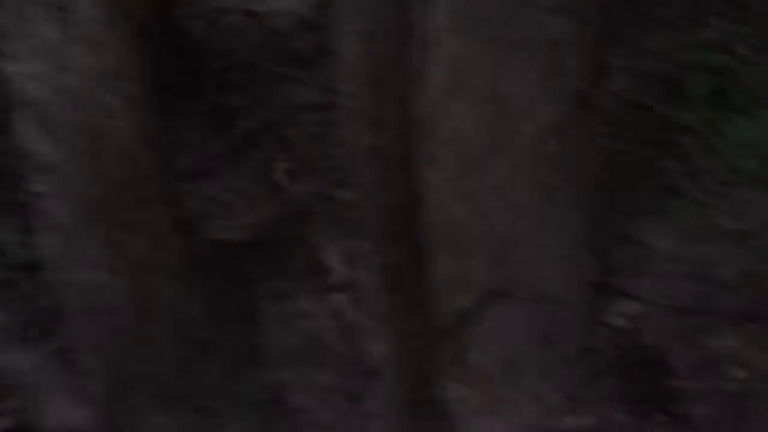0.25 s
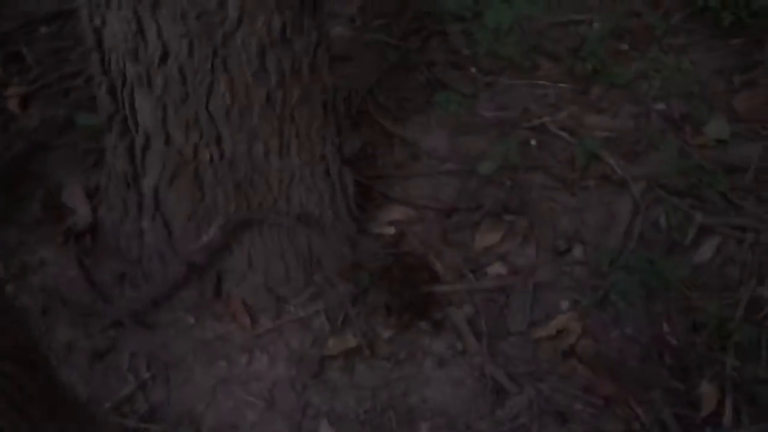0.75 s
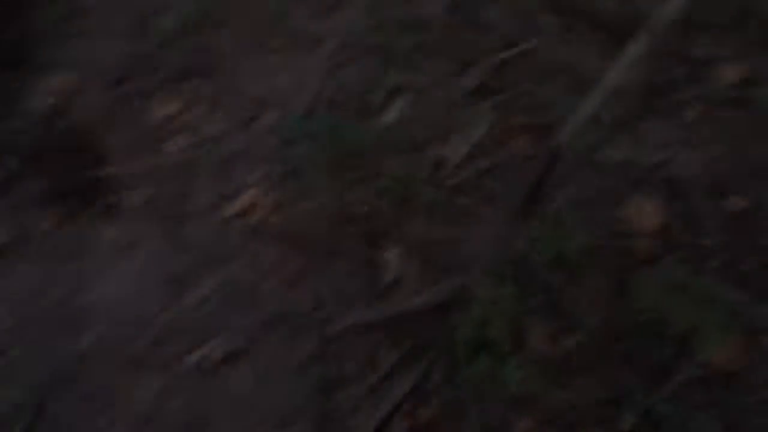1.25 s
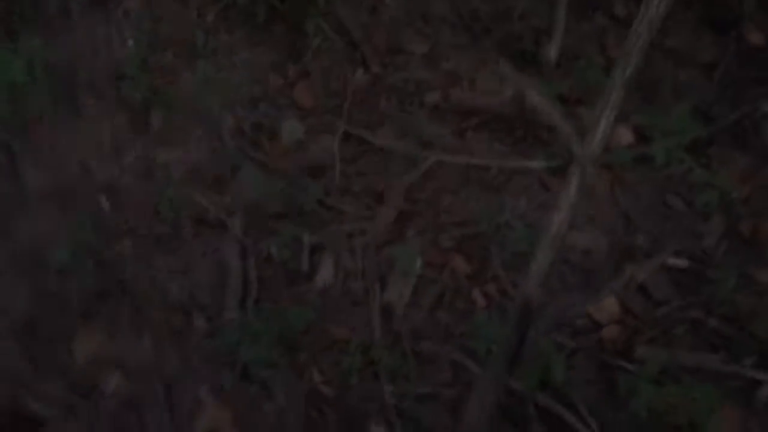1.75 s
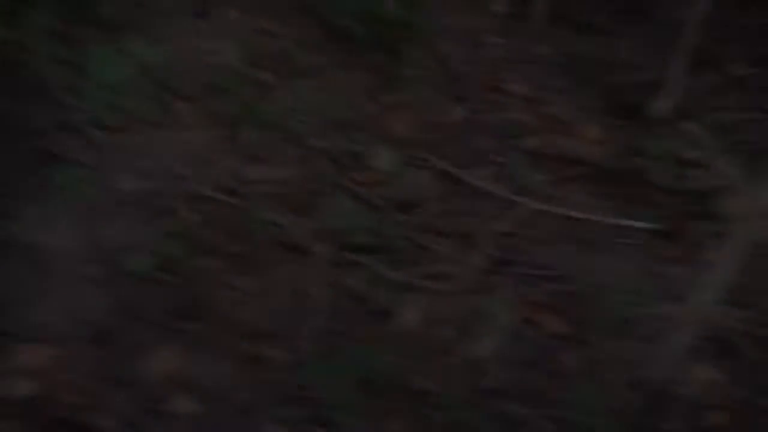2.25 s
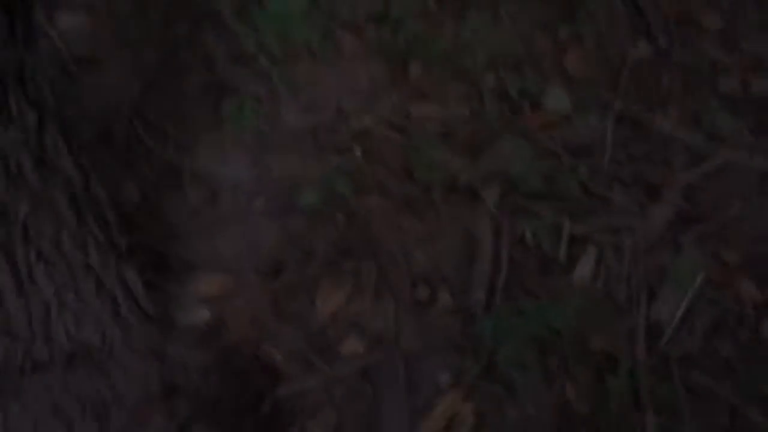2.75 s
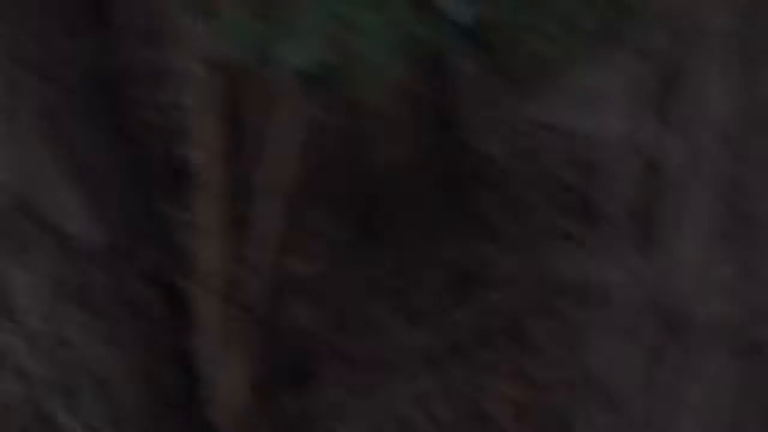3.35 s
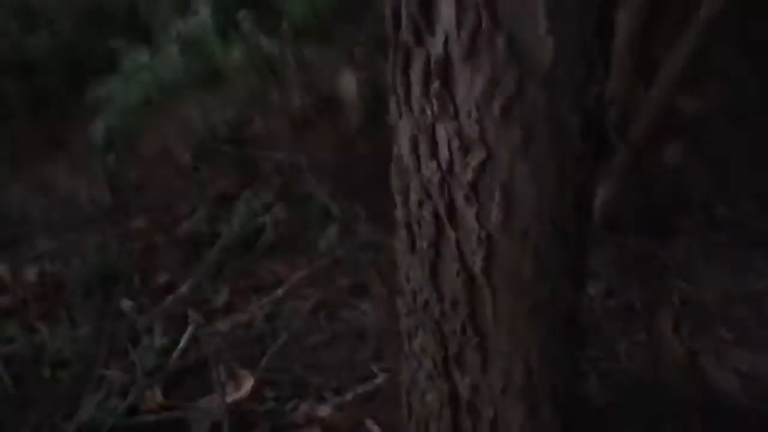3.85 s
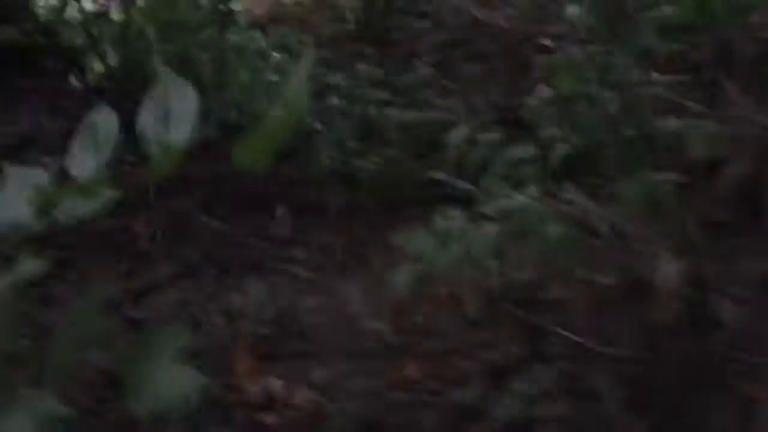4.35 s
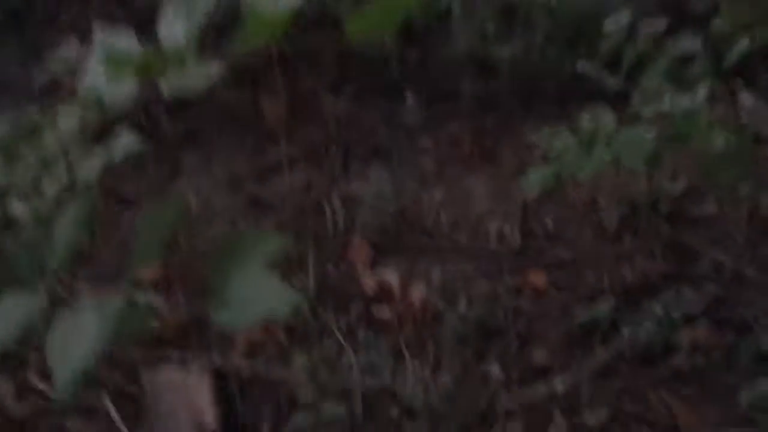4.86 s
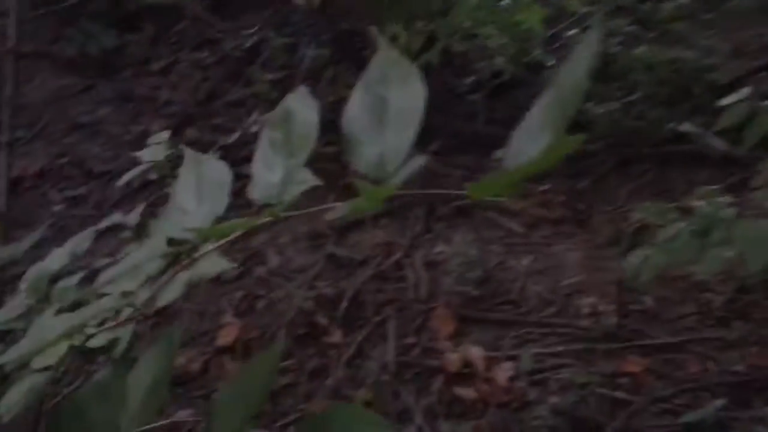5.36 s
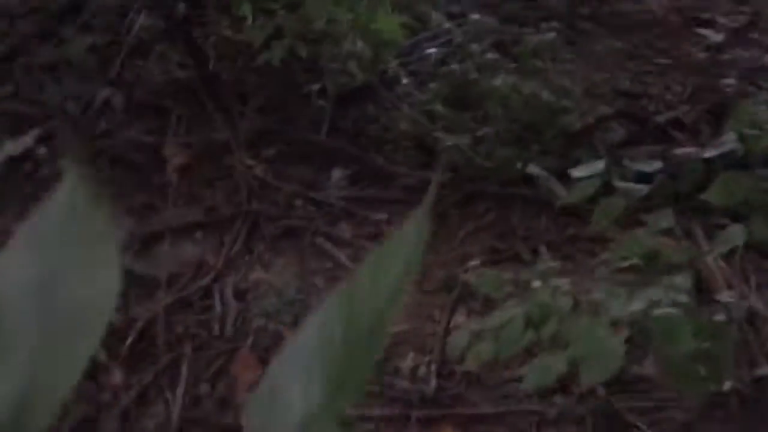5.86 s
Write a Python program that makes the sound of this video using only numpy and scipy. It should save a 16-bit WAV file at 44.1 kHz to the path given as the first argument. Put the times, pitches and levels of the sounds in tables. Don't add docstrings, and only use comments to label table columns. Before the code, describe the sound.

Slow footsteps crush dry leaves and snap brittle twigs on a woodland floor, over faint wind rumble, quiet hiss and distant insects.

```python
import sys
import numpy as np
from scipy import signal
from scipy.fft import rfft, irfft
from scipy.io import wavfile
from scipy.ndimage import uniform_filter1d

SR = 44100
rng = np.random.default_rng(int(sys.argv[2]) if len(sys.argv) > 2 else 0)


def rack_gain(trim_db):
    fader = np.asarray(trim_db, float)
    return 10 ** (fader / 20)


def output_pcm(signal):
    pcm = np.clip(np.atleast_2d(signal).T, -1, 1) * 32767
    wavfile.write(sys.argv[1], SR, np.round(pcm).astype(np.int16))


N = 269010

# frequency in Hz, density in dB per Hz.
AIR_COLOUR = [(88, -45.5), (150, 3), (230, -2), (340, -9), (545, -14), (1550, -14), (1890, -22),
              (2340, -18.5), (4800, -33), (6070, -36), (7660, -62), (10800, -28), (14600, -11),
              (15600, -6.5), (16500, -14)]
# pitch in Hz, width in Hz, level in dB.
INSECTS = [(6124, 290, -72.5), (5400, 500, -75.5), (4560, 140, -84.5), (2350, 370, -78.5)]
# frequency in Hz, width in Hz, level in dB.
HUMS = [(52.8, 11.6, -1.5), (71.4, 13.7, -5.5), (108, 21.6, 7), (135, 80, -8.5), (208, 42, -6)]
# time in seconds, rumble level in dB.
GUSTS = [(0.0, -49), (1.2, -53), (1.53, -47), (2.02, -54), (2.65, -50), (2.94, -50), (3.19, -56),
         (3.7, -53.5), (3.79, -54), (3.86, -54), (4.02, -48), (4.72, -51), (4.82, -47), (5.3, -60),
         (5.54, -59), (5.84, -54.5), (6.1, -46.5)]

# time in seconds, crush level in dB.
CRUSH = [(0.0, -66), (0.42, -70.5), (0.58, -59.5), (1.05, -65.5), (1.6, -55), (1.92, -62.5), (2.33, -58),
         (2.7, -67), (2.95, -63), (3.52, -55.5), (3.75, -61), (3.92, -58), (4.06, -66), (4.35, -57),
         (4.89, -64), (5.13, -61), (5.33, -56.5), (5.6, -60), (5.81, -57.5), (6.1, -60.5)]
# middle in seconds, half length in seconds, crush level in dB,
# large leaves in dB relative to the small ones.
LEAF_ROLLS = [(0.525, 0.045, -43, -8.5), (1.024, 0.058, -58, 2.5), (1.311, 0.037, -47.5, -12),
              (1.379, 0.033, -53, -13), (1.42, 0.024, -60, -5), (1.634, 0.04, -39, -8.5),
              (1.708, 0.045, -53, -9), (2.285, 0.047, -55.5, -3), (2.406, 0.024, -45.5, -5.5),
              (2.575, 0.018, -68.5, 11.5), (2.646, 0.037, -64, 5.5), (3.172, 0.016, -42, -15.5),
              (3.229, 0.037, -45, -7.5), (3.297, 0.048, -55, -9), (4.58, 0.044, -49, -5.5),
              (4.67, 0.069, -62.5, -3.5), (4.822, 0.047, -51, -23), (5.327, 0.015, -50.5, -5),
              (5.42, 0.04, -42, -8.5), (2.957, 0.026, -55, -5.5), (4.166, .012, -44.5, -9),
              (5.366, 0.011, -42, -5), (5.242, 0.041, -58.5, 3)]
LEAF_HZ = (1300, 1900, 2800, 4100, 5500, 6500, 8800, 12500, 14500)
# frequency in Hz, gain in dB.
CRISP = [(1800, -21.5), (3200, -14), (4600, -7.5), (6400, -3), (8300, -5.5), (9500, -3), (11500, -2.5),
         (14000, -37)]
DULL = [(350, -16), (650, -7), (1000, -3.5), (2200, -1.5), (3300, -2.5), (4300, -4), (6500, -17.5)]
FINE = [(7500, -39), (9500, -0.5), (11500, 4.5), (13000, 3.5), (15300, 5.5), (16000, 7), (16800, -41)]

# start in seconds, peak
# in dB, dull part in dB relative to the peak.
TICKS = [(0.0785, -44, -10), (0.3564, -39.5, -12), (0.397, -37, -13), (0.444, -40, -4), (0.606, -35.5, -11),
         (0.7136, -44, -6), (0.8654, -38, -13), (0.9444, -36.5, -13.5), (0.9933, -36, -16),
         (1.084, -39, -27), (1.1046, -39, -13), (1.5212, -39, -24), (1.5755, -36, -16), (1.9524, -50, -16),
         (2.0796, -52, -10), (2.141, -41, -27), (2.86, -42, -15), (3.1352, -35.5, -8.5), (3.217, -41, -24),
         (3.274, -34, -23), (3.4168, -45, -5), (3.752, -47, -3), (3.8016, -40, -32), (4.2762, -34, -12),
         (4.449, -39, -22), (4.635, -36, -19), (4.677, -37, -13), (4.792, -49, -21), (5.3105, -38, -18),
         (6.066, -44, -16),
         (0.506, -33, -15), (0.529, -32, -15), (0.698, -40, -12), (1.0485, -42, -15), (1.1403, -44, -15),
          (1.612, -31, -17), (1.632, -30, -15), (1.667, -34, -15), (1.851, -42, -25), (2.26, -43, -15),
          (2.287, -44, -15), (2.381, -39, -13), (2.7935, -52, -14), (3.246, -37, -13), (3.358, -36, -17),
          (3.5229, -35, -18), (4.1056, -48, -20), (4.139, -37.5, -18), (4.543, -40, -14), (4.605, -42, -15),
          (4.7187, -41, -15), (4.9596, -53, -15), (5.3223, -37, -15), (5.5837, -49, -15), (5.733, -40, -4),
          (6.0057, -45, -15)]
# start in seconds, peak in dB, dull and fine parts in dB relative to the peak.
STALKS = [(0.4987, -37, -3, -18), (0.5134, -33, -25, -15), (0.5433, -21, -32, -18), (0.7392, -36, -18, -9),
          (0.7539, -27.5, -16, -12), (0.7713, -26.5, -17, -11), (0.844, -35.5, -30, 0.5),
          (1.217, -35.5, -11, -20), (1.2397, -35, -23, -6), (1.3302, -25, -14, -8), (1.4152, -32, -15, -10),
          (1.555, -34, -17, -9), (2.1648, -30.5, -16, -9), (2.3123, -33, -25, -9), (2.396, -40, -19, -12),
          (2.46, -32, -18, -14), (2.8911, -32, -11.5, -12), (3.1574, -40, -10, -14), (3.163, -35, -13, -16),
          (3.3057, -28, -19, -10), (3.6684, -28, -37, -11), (4.3214, -34.5, -7.5, -12),
          (4.342, -35.5, -21, -6), (4.495, -37, -10.5, -2.5), (4.8167, -30.5, -30, -9),
          (5.1165, -30, -38, -14), (5.47, -34, -20, -7), (5.6277, -33, -17, -13), (5.834, -31, -11, -16),
          (1.396, -32, -20, -10)]
# start in seconds, peak in dB, dull and fine parts in dB relative
SNAPS = [(0.6406, -29, -11, -10), (0.683, -22, -28, -10), (0.8218, -22, -38, -9.5), (1.174, -25, -13, 0),
         (1.291, -18.5, -21, -8), (1.3565, -14.5, -12, -18), (1.3845, -24.5, -25, -2.5),
         (1.4495, -27.5, -10, -10), (1.6566, -20, -17, -18), (2.9764, -15.5, -32, -12),
         (3.044, -30, -21, -2), (3.3324, -11, -12.5, -3), (3.3722, -21.5, -16.5, -14),
         (3.4028, -27.5, -27, -8), (3.6137, 4.5, -24.5, -15), (3.6484, -19, -13, -12),
         (4.1678, -15, -12, -3), (4.5695, -23, -37, -15), (5.215, -18, -22, -5.5), (5.358, -33, -16.5, -6),
         (5.3729, -10, -30, -2), (5.4849, -15, -47, -17), (5.6704, -2.5, -28, -11.5),
         (5.689, -23.5, -15, -10), (5.7618, -22, -26, -5), (5.8, -18, -15.5, -3.5),
         (5.869, -14, -16.5, -4.5), (5.9148, -18, -15, -9.5)]
# start in seconds, peak in dB,
# dull and fine parts in dB relative to the peak.
LAST_FIBRES = [(1.277, -30, -15, -4), (1.3036, -21, -31, -10), (1.378, -30, -23, -1),
               (3.3286, -25, -25, -14), (3.3343, -18, -15, -11), (3.6155, -7.5, -14, -12),
               (5.3775, -11.5, -32, -7), (5.4795, -24, -22, -11), (1.288, -29, -25, -6),
               (1.3185, -29, -22, -12), (1.434, -40, -4, -14)]
# start in seconds, peak in dB, pitch in Hz.
SPLINTERS = [(0.5235, -32, 6050), (0.5425, -37, 6430), (1.1745, -34, 2220), (1.292, -32, 6360),
             (1.305, -28, 5500), (1.3567, -28.5, 2500), (1.3581, -27, 1310), (1.62, -36, 2800),
             (1.64, -42, 4600), (3.166, -34, 3580), (3.333, -20, 3570), (3.374, -31, 2330),
             (3.3733, -33, 3620), (3.6145, -18, 1560), (3.615, -17, 2200), (3.648, -35, 2500),
             (4.168, -28, 5900), (4.168, -30, 3900), (4.321, -40.5, 2900), (4.348, -42, 1600),
             (4.342, -44, 2520), (4.54, -46, 2600), (4.6, -42, 2600), (5.2158, -23.5, 5180),
             (5.215, -33, 1350), (5.379, -24, 6320), (5.4848, -23, 5800), (5.6715, -21, 7000),
             (5.671, -24, 4230), (5.684, -34.5, 850), (5.8005, -30, 2450), (5.8005, -29, 6890),
             (5.87, -25, 6040), (5.915, -36, 6220), (3.617, -21, 420), (3.6155, -20, 890),
             (3.625, -32, 980), (3.6142, -10, 8300), (1.295, -32, 590), (1.3585, -30, 560),
             (5.6735, -27, 640), (5.672, -22, 8600), (3.023, -38, 250), (3.047, -42, 200), (2.6, -46, 1900),
             (2.65, -44, 2400), (5.117, -40, 4500), (5.363, -38, 800), (1.558, -45, 900),
             (0.768, -40, 1300)]
# start in seconds, peak in dB, low mode in Hz, high mode in Hz,
# high mode in dB relative to the low.
KNOCKS = [(0.639, -54, 220, 1240, 14.5), (1.028, -33, 212, 995, -1), (1.175, -36.5, 286, 990, -0.5),
          (1.2915, -24.5, 229, 870, 0), (1.324, -32.5, 260, 820, -23), (1.3569, -20.5, 342, 814, -21),
          (1.4485, -45, 197, 2190, 3), (1.657, -34.5, 300, 1600, 0), (2.891, -42, 180, 1260, 6),
          (2.976, -37.5, 360, 2360, 3), (3.333, -26, 235, 2220, 10), (3.6162, -19, 444, 910, 2),
          (4.135, -29, 384, 2400, -17), (4.167, -20.5, 233, 720, -32), (4.348, -37.5, 260, 1000, 7),
          (4.571, -35, 190, 1070, -2), (5.21, -30.5, 240, 1030, 0.5), (5.362, -37, 315, 710, -6),
          (5.372, -42, 587, 1200, 5), (5.483, -37, 320, 1230, 2), (5.6725, -24, 218, 690, 0),
          (5.801, -32.5, 290, 810, -4), (5.869, -31, 240, 1030, 5.5), (5.916, -35, 305, 810, 3)]

# middle in seconds, half length in seconds, level in dB.
TRILLS = [
    (1.2, .12, -74),
    (3.12, .1, -72),
    (4.87, .14, -75),
]
# middle in seconds, half length in seconds, level in dB.
PRESSES = [
    (1.588, 0.042, -57),
    (2.404, 0.057, -64.5),
    (3.524, 0.043, -60.5),
    (4.294, 0.31, -63.5),
    (5.297, 0.13, -60.5),
    (5.426, 0.063, -55.5),
    (5.513, 0.037, -60),
    (5.743, 0.017, -51),
    (5.833, 0.041, -54.5),
]
# frequency in Hz, gain in dB.
SOIL_COLOUR = [(120, -21), (250, 5.5), (380, 4.5), (600, -1), (900, 0.5), (1600, -17.5)]
# start in seconds, peak in dB, pitch in Hz, decay by 60 dB in seconds.
BUMPS = [
    (2.99, -32.5, 99, 0.03),
    (3.025, -39, 128, 0.061),
    (3.039, -33, 80.8, 0.19),
    (3.079, -30, 63.4, 0.042),
    (3.12, -32, 72, 0.078),
    (3.21, -40, 79, 0.032),
]
# time in seconds, pitch in Hz, level in dB.
ENGINE = [
    (3.75, 132.7, -75),
    (4.0, 132.1, -51.5),
    (4.35, 135, -50),
    (4.7, 135, -51),
    (4.85, 135, -64),
]
# frequency in Hz, width in Hz, depth from 0 to 1.
MIC_PORT = (10550, 600, .4)


def rms1(x):
    return x / np.sqrt(np.mean(x ** 2, axis=-1, keepdims=True))


def colour(x, points):
    hz, db = np.transpose(points)
    grid = np.fft.rfftfreq(4096, 1 / SR)
    log_gain = np.interp(np.log(grid + 1), np.log(hz), db) * np.log(10) / 20
    cep = irfft(log_gain)
    cep[1:2048] *= 2
    cep[2049:] = 0
    taps = irfft(np.exp(rfft(cep)))[:1024]
    taps = taps.reshape((1,) * (x.ndim - 1) + (-1,))
    return signal.fftconvolve(x, taps, axes=-1)[..., :x.shape[-1]]


def ring(x, hz, width_hz):
    return signal.lfilter(*signal.iirpeak(hz, hz / width_hz, SR), x)


def ring_twice(x, hz, width_hz):
    return ring(ring(x, hz, width_hz), hz, width_hz)


def walk(rate):
    k = int(SR / rate)
    held = np.repeat(rng.standard_normal(N // k + 1), k)
    return 0.67 * uniform_filter1d(uniform_filter1d(held, k), k)[:N]


def curve(table):
    s, *columns = np.transpose(table)
    return [np.interp(np.arange(N) / SR, s, c) for c in columns]


def add(out, s, sound):
    i = int(s * SR)
    out[i:i + len(sound)] += sound[:N - i]


def roll(middle, half, db):
    end_db, squareness = -11, 1.72
    distance = np.minimum(np.abs(np.arange(N) / SR - middle) / half, 4)
    return rack_gain(db + end_db * distance ** squareness)


def crackle(per_s, spread_db, ring_s):
    size_db = spread_db * np.minimum(rng.exponential(size=N), 3.6)
    breaks = (rng.random(N) < per_s / SR) * rack_gain(2 * size_db)
    power = signal.lfilter([1], [1, -np.exp(-2 / (ring_s * SR))], breaks)
    return np.sqrt(power) * rng.standard_normal(N)


def background():
    hiss = rack_gain(-56.5 + 0.25 * walk(4.3)) * rms1(colour(rng.standard_normal(N), AIR_COLOUR))
    chorus = 0
    for hz, width_hz, db in INSECTS:
        chorus = chorus + rack_gain(db + 4 * walk(12)) * rms1(ring_twice(rng.standard_normal(N), hz, width_hz))
    hums = []
    for hz, width_hz, db in HUMS:
        hum = rms1(ring_twice(rng.standard_normal(N), hz, 1.6 * width_hz))
        hums.append(rack_gain(db + 2.2 * walk(11)) * hum)
    deep_db = curve(GUSTS)[0]
    calm_db, upper_follows = -55.5, 0.39
    upper_db = -58.5 + upper_follows * (deep_db - calm_db)
    return hiss + chorus + rack_gain(deep_db) * rms1(sum(hums[:2])) + rack_gain(upper_db) * rms1(sum(hums[2:]))


def patches(depth_db):
    return rack_gain(depth_db * walk(35.))


def single_leaves(small_gain, large_gain):
    out = 0
    for hz in LEAF_HZ:
        gain = large_gain if hz < 3500 else small_gain
        leaf = rms1(ring(crackle(90., 3.2, 0.0033), hz, 0.12 * hz))
        out = out + gain * patches(2.5 * 1.4) * leaf
    return out / np.sqrt(len(LEAF_HZ))


def leaves():
    large_far = rack_gain(-7)
    small_gain = sum(roll(*row[:3]) for row in LEAF_ROLLS)
    large_gain = sum(roll(*row[:3]) * rack_gain(row[3]) for row in LEAF_ROLLS)
    bed = rack_gain(curve(CRUSH)[0] + 2.0 * walk(24.27))
    jerk = rack_gain(1.2 * walk(60))
    shared = rms1(crackle(450., 4.3, 0.0013))
    out = 0
    for points, db, far, near in ((CRISP, -4., 1, small_gain), (FINE, -2., 1, small_gain),
                                  (DULL, 0., large_far, large_gain)):
        even = rms1(crackle(1700.0, 5.1, 0.0038))
        coarse = rms1(shared + 0.76 * rms1(crackle(900., 2.2, 0.013)))
        crush = far * bed * even + near * jerk * patches(2.5) * coarse
        out = out + rack_gain(db) * colour(crush, points) / colour(even[:SR], points).std()
    small_lone = np.hypot(small_gain, 0.14 * bed)
    large_lone = np.hypot(large_gain, 1.05 * bed * large_far)
    return out + rack_gain(-5) * single_leaves(small_lone, large_lone)


def breaks():
    tick_ms, tick_scatter_db, tick_fine_db = 3.1, -19.5, -8
    return ([(*row, 2.75, -27.5 - 0.16 * row[1]) for row in SNAPS]
            + [(*row, 2.4, -55) for row in LAST_FIBRES]
            + [(*row, tick_ms, tick_scatter_db) for row in STALKS]
            + [(*row, tick_fine_db, tick_ms, tick_scatter_db) for row in TICKS])


def snaps():
    out, t = np.zeros(N), np.arange(SR // 8) / SR
    s, peak_db, dull_db, fine_db, length_ms, scatter_db = np.transpose(breaks())[..., None]
    noise = np.moveaxis(rng.standard_normal((len(s), 3, len(t))), 1, 0)
    jerks = rack_gain(2.7 * np.repeat(noise[2, :, :300], SR // 2000, axis=1)[:, :len(t)])
    clumps = rack_gain(3.1 * np.repeat(noise[2, :, 300:400], SR // 400, axis=1)[:, :len(t)])
    first = 1 + 2.1 * np.exp(-t / 0.00054)
    decay = np.exp(-1000 * t / np.clip(length_ms, .3, 9))
    burst = noise[0] * jerks * first * (1 - np.exp(-t / 0.00013)) * decay
    burst /= burst[:, :SR // 100].std(axis=1, keepdims=True)
    burst += 8.0 * np.sign(noise[2, :, -1:]) * np.exp(-((t - .0003) * SR) ** 2)
    fade = np.exp(-t / 0.015) + rack_gain(-11.0) * np.exp(-t / 0.024)
    tail = noise[1] * clumps * (1 - np.exp(-t / 0.0065)) * fade
    sound = 0
    for points, part_db, lag_s in ((CRISP, -12., .0001), (DULL, dull_db, .0005), (FINE, fine_db, .0001)):
        direct = rack_gain(part_db - 9.5) * (1 - np.exp(-t / lag_s)) * burst
        scatter = rack_gain(scatter_db + 1.1 * part_db + 7) * tail
        sound = sound + colour(direct + scatter, points) / colour(noise[1, 0], points).std()
    for k in range(len(s)):
        add(out, s[k, 0] + .0003, rack_gain(peak_db[k]) * sound[k])
    return out


def splinters():
    out, t = np.zeros(N), np.arange(SR // 40) / SR
    cycles, least_width_hz = 9.5, 150
    for s, db, hz in SPLINTERS:
        shake = rng.standard_normal(len(t)) * np.exp(-t / 0.0022)
        tone = ring(shake, hz, max(hz / cycles, least_width_hz))
        add(out, s, rack_gain(db - 4) * tone / np.abs(tone).max())
    return out


def knocks():
    out, t = np.zeros(N), np.arange(SR // 10) / SR
    wood_t60_s = 0.021
    for s, db, low_hz, high_hz, high_db in KNOCKS:
        grit = rng.standard_normal(len(t)) * np.exp(-t / 0.0042) * (1 - np.exp(-t / 0.00048))
        push = np.exp(-t / 0.00026) * (1 - np.exp(-t / 0.00031)) + 0.18 * grit
        low, high = (ring(push, hz, np.log(1000) / np.pi / wood_t60_s * (hz / 500) ** 0.49)
                     for hz in (low_hz, high_hz))
        thud = ring_twice(grit, 1.98 * low_hz, 2.0 * low_hz)
        low, high, thud = (x / np.abs(x).max() for x in (low, high, thud))
        add(out, s + .0006, rack_gain(db - 7.5) * (low + rack_gain(high_db) * high + rack_gain(-3.5) * thud))
    return out


def cricket():
    trill = ring_twice(rng.standard_normal(N), 4460, 130)
    return sum(roll(*row) for row in TRILLS) * rms1(trill)


def soil():
    crumble = rms1(colour(crackle(150., 2.1, 0.0055), SOIL_COLOUR))
    return sum(roll(*row) for row in PRESSES) * crumble


def bumps():
    out, t = np.zeros(N), np.arange(SR // 5) / SR
    for s, db, hz, t60 in BUMPS:
        swing = (1 - np.exp(-t / 0.0054)) * np.exp(-np.log(1000) * t / t60) * np.sin(2 * np.pi * hz * t)
        add(out, s, rack_gain(db) * swing / np.abs(swing).max())
    return out


def engine():
    hz, db = curve(ENGINE)
    phase = 2 * np.pi * np.cumsum(hz + 1.05 * walk(8.47)) / SR
    return rack_gain(db + 3.1 * walk(9)) * np.sin(phase)


def scene():
    steps = leaves() + snaps() + splinters() + knocks() + soil()
    return (background() + steps + cricket() + bumps() + engine())[None]


def top_cut(x):
    return signal.sosfilt(signal.butter(12, 17000, fs=SR, output="sos"), x)


def record(dry):
    port_hz, port_width_hz, port_depth = MIC_PORT
    ported = dry - port_depth * ring(dry, port_hz, port_width_hz)
    full = signal.sosfilt(signal.butter(2, 36, "highpass", fs=SR, output="sos"), ported)
    ceiling = .8
    full = ceiling * np.tanh(full / ceiling)
    top = signal.sosfiltfilt(signal.ellip(8, .1, 45, 15850, "highpass", fs=SR, output="sos"), full)
    power = np.diff(full, prepend=0) ** 2
    before = uniform_filter1d(power, size=1001, origin=500)
    attack = uniform_filter1d(power, size=128) > np.maximum(6 * before, rack_gain(2 * -33))
    top_open = uniform_filter1d(1. * attack, size=128)
    return top_cut(full - top * (1 - top_open))


dry = scene()
out = record(dry)
output_pcm(out)
```